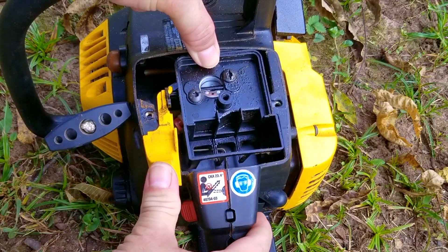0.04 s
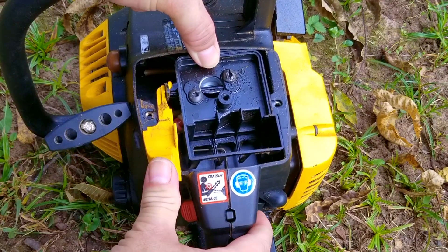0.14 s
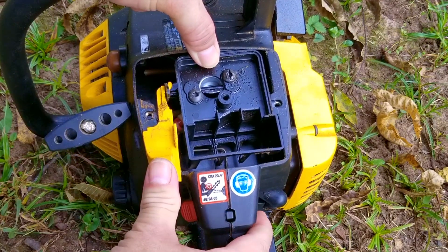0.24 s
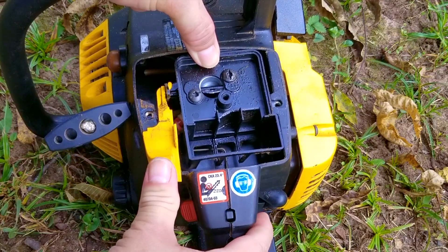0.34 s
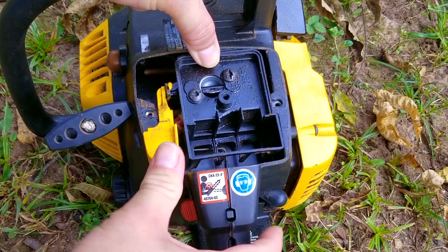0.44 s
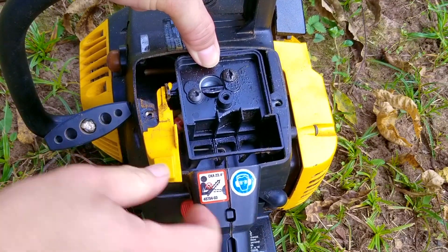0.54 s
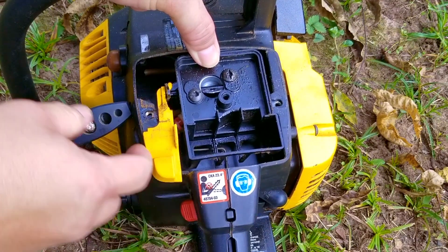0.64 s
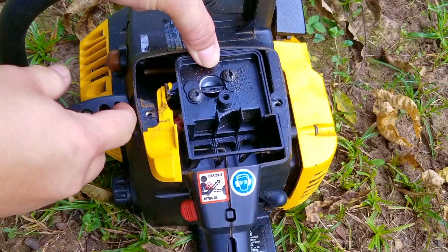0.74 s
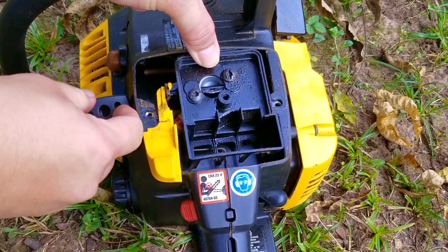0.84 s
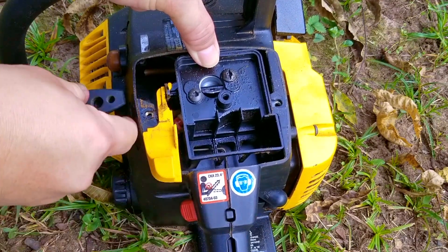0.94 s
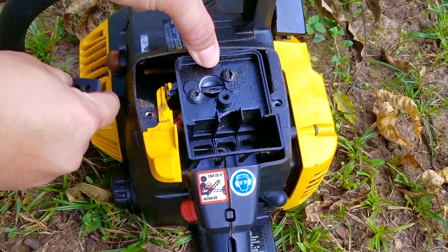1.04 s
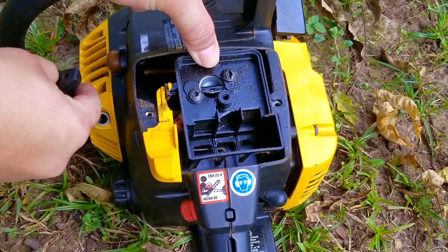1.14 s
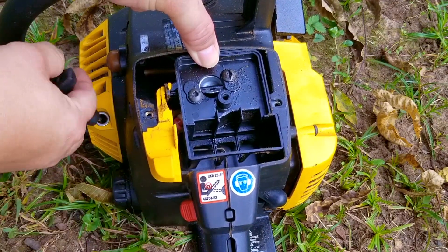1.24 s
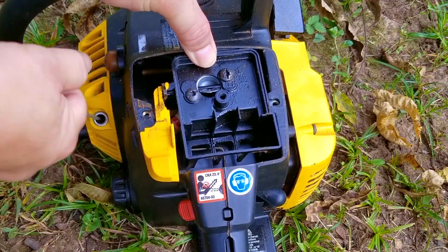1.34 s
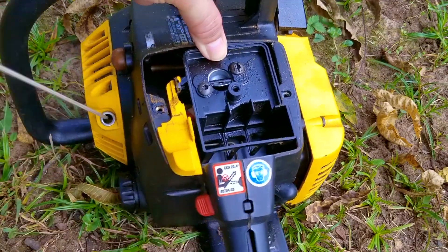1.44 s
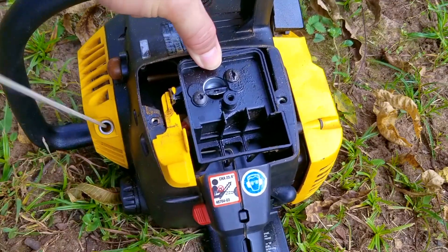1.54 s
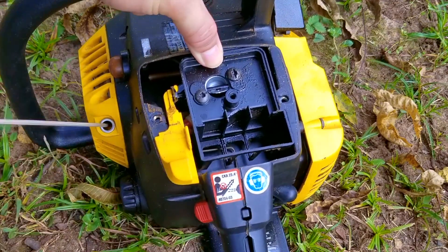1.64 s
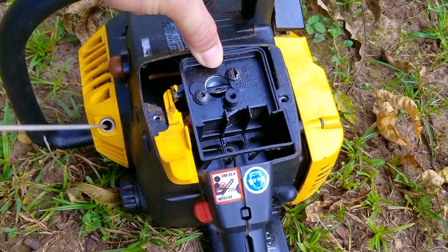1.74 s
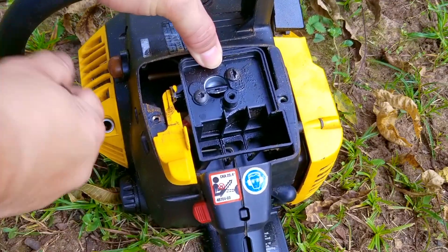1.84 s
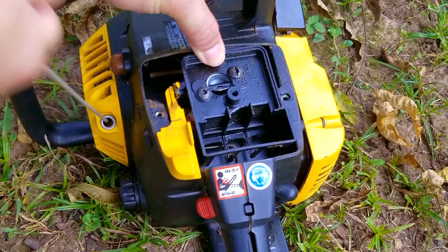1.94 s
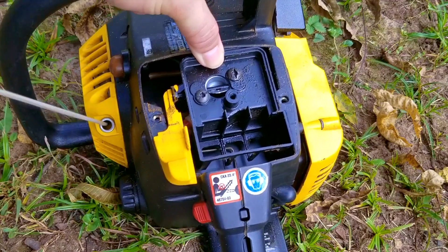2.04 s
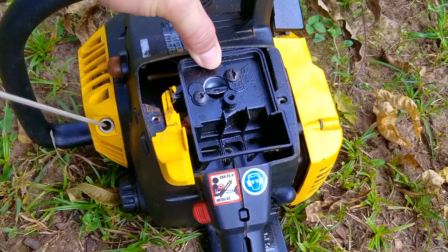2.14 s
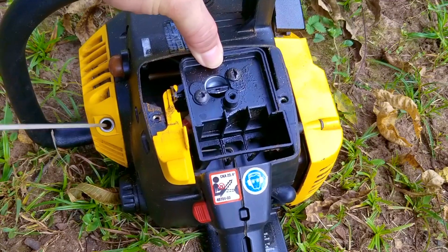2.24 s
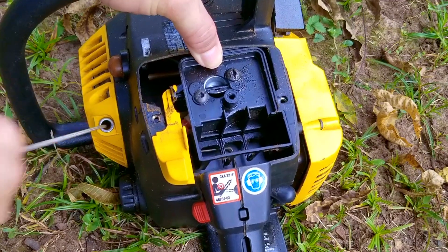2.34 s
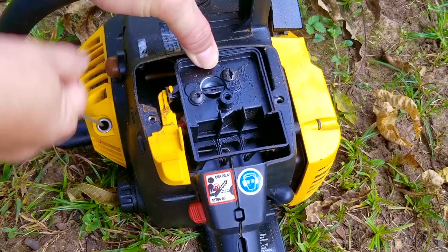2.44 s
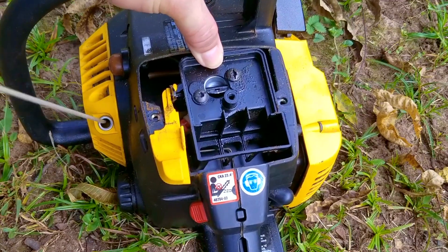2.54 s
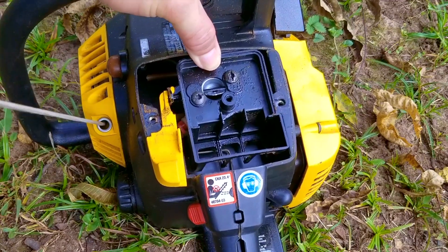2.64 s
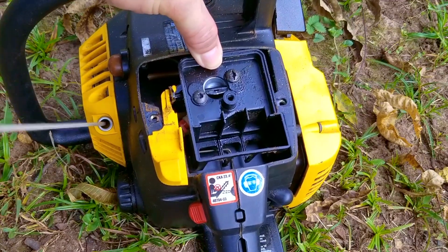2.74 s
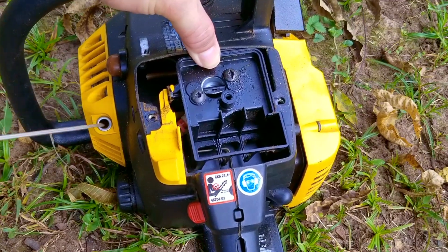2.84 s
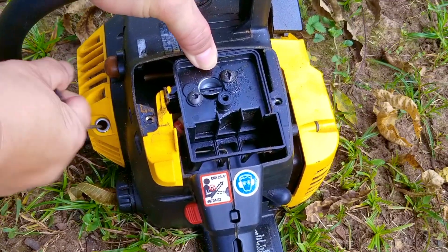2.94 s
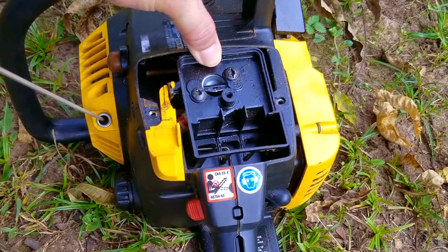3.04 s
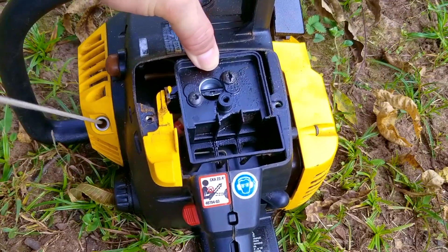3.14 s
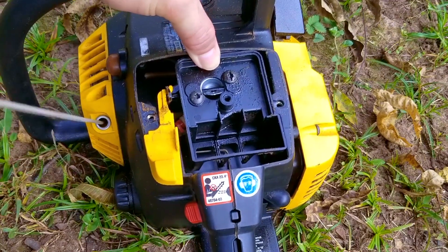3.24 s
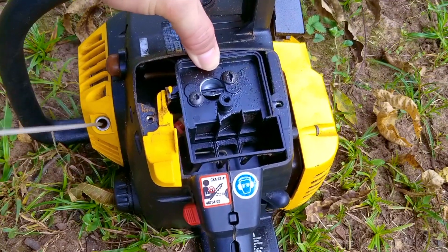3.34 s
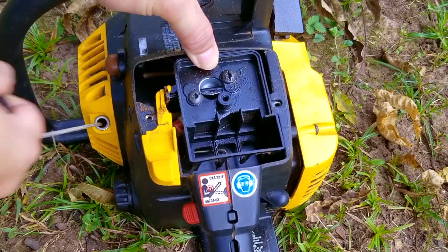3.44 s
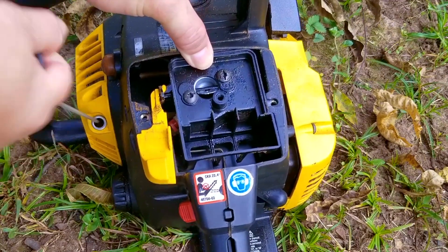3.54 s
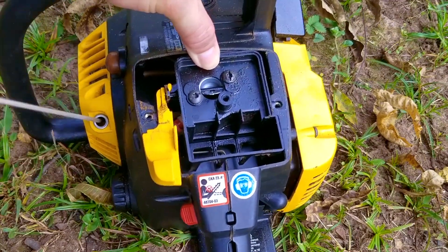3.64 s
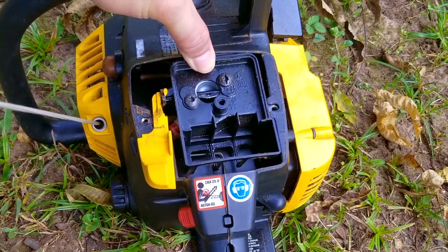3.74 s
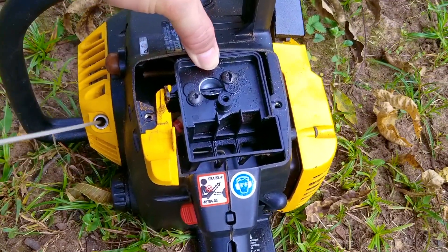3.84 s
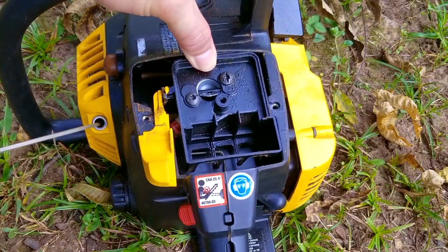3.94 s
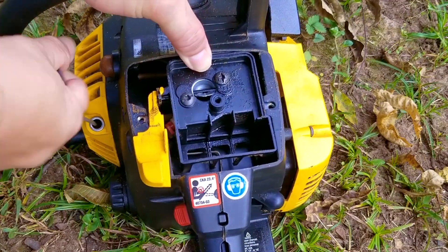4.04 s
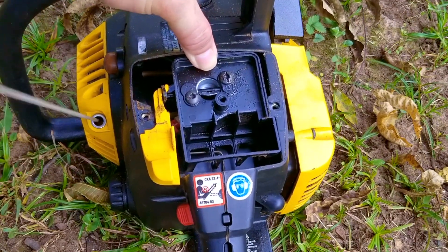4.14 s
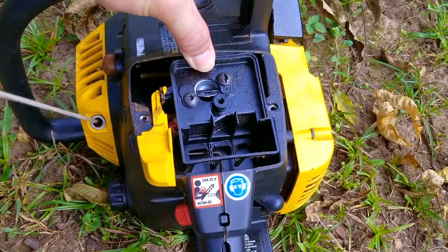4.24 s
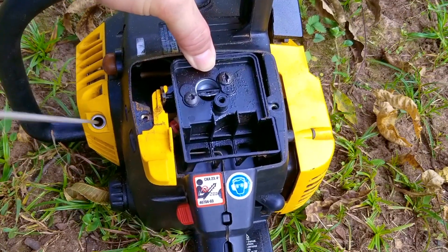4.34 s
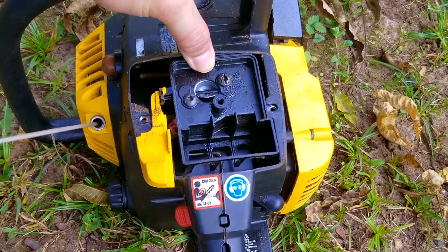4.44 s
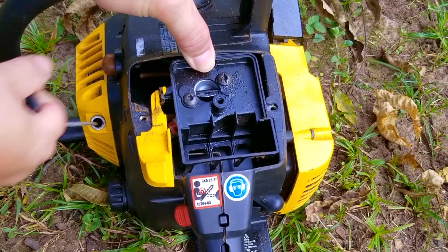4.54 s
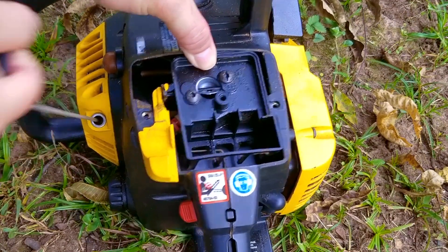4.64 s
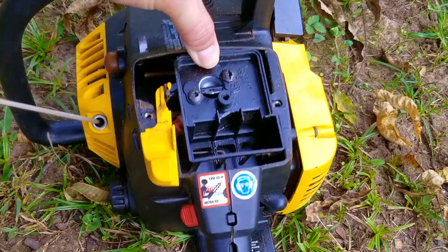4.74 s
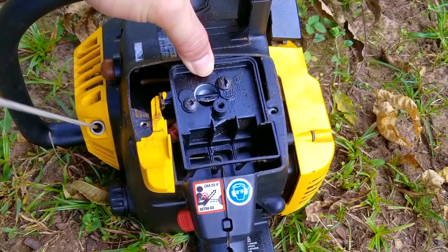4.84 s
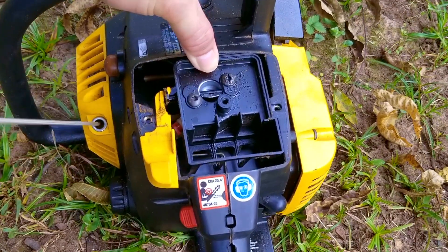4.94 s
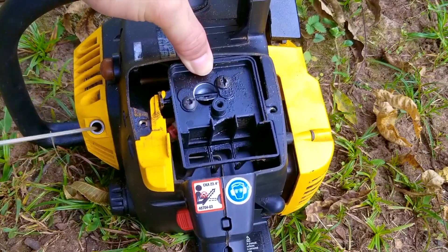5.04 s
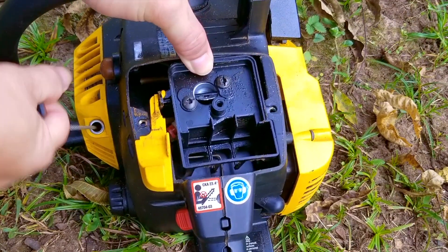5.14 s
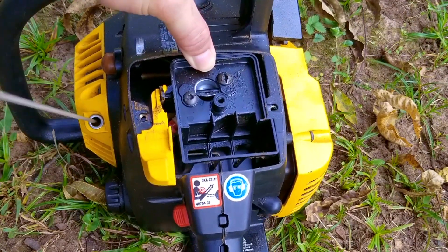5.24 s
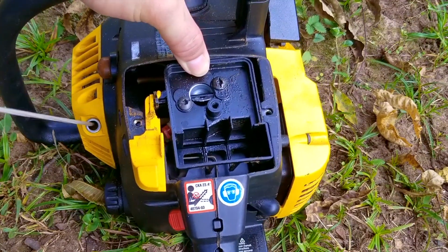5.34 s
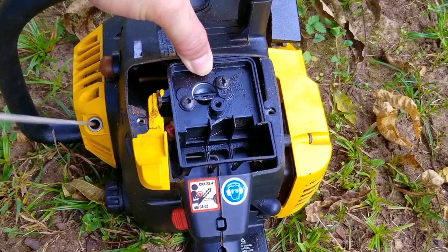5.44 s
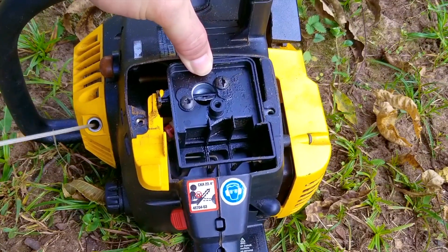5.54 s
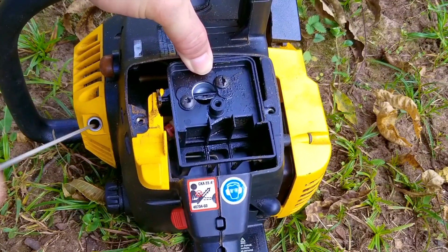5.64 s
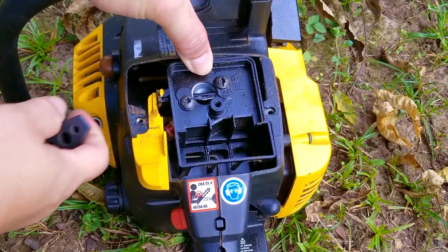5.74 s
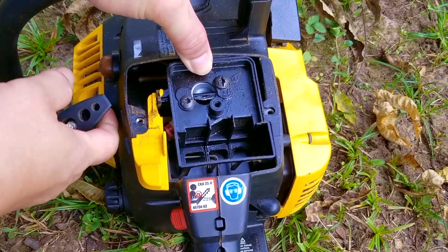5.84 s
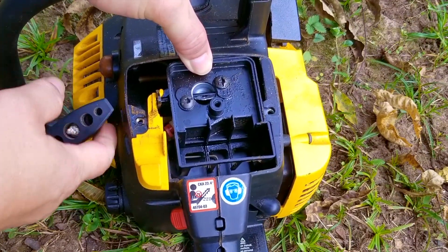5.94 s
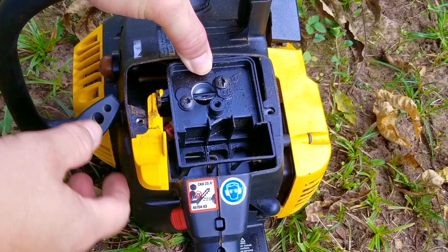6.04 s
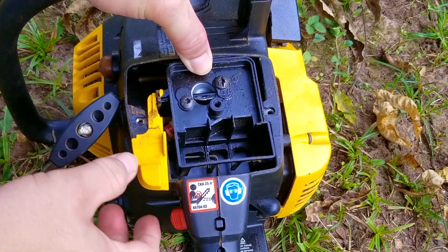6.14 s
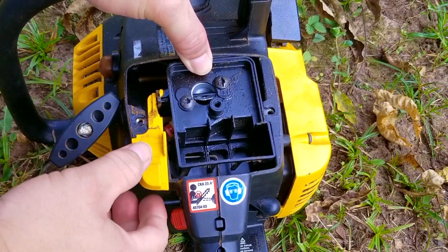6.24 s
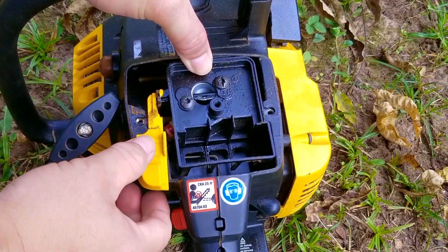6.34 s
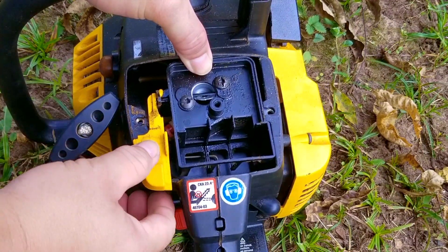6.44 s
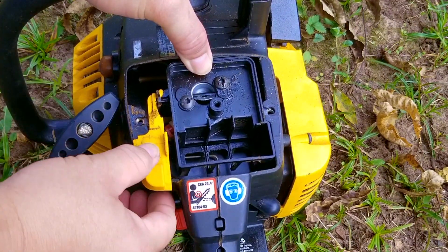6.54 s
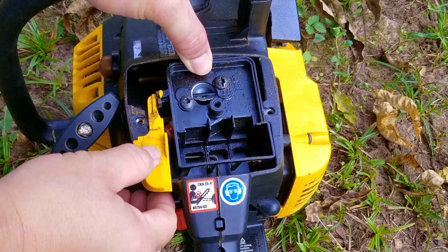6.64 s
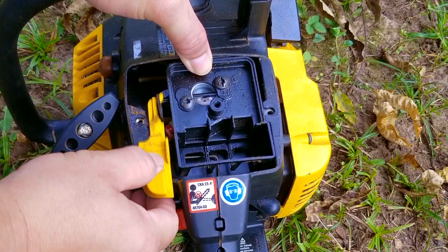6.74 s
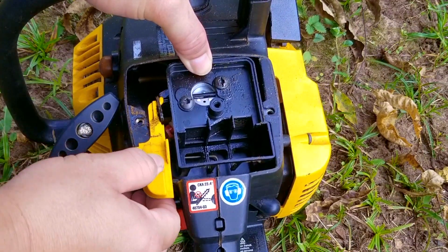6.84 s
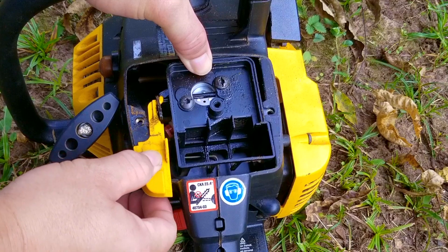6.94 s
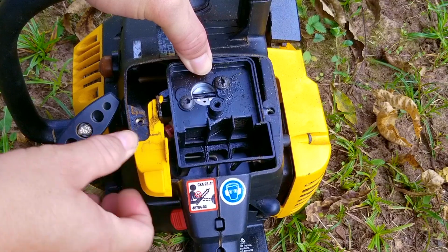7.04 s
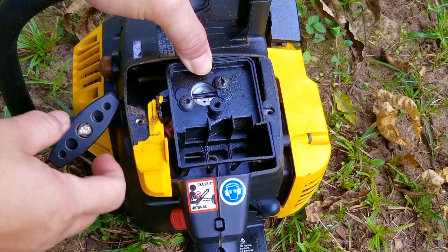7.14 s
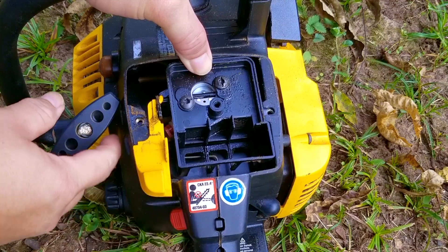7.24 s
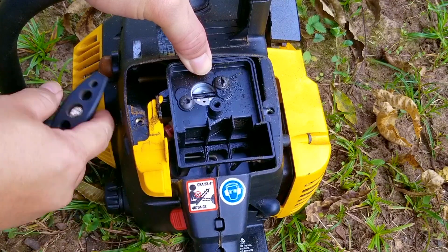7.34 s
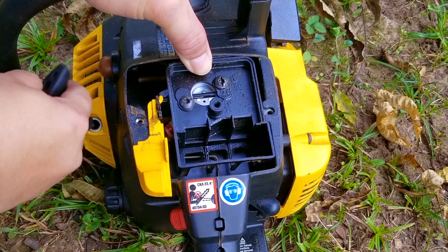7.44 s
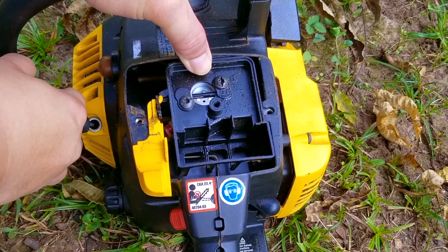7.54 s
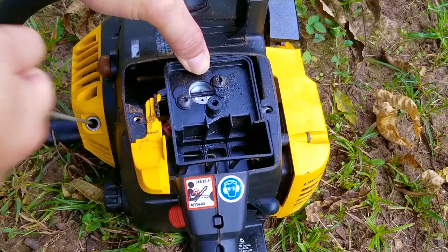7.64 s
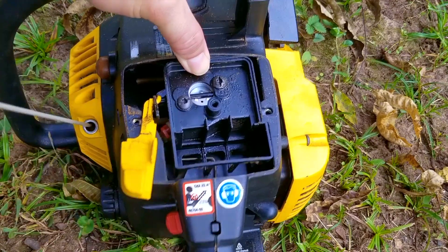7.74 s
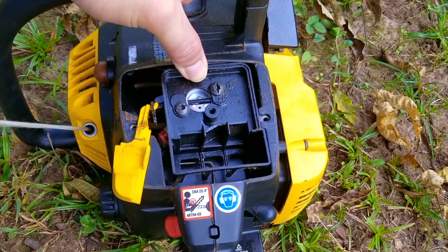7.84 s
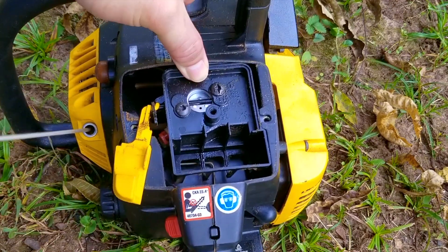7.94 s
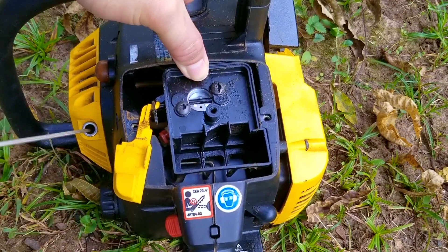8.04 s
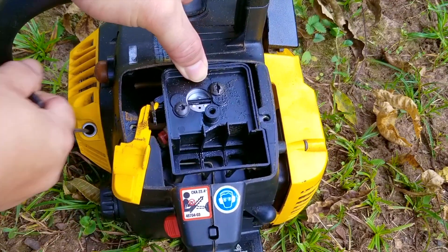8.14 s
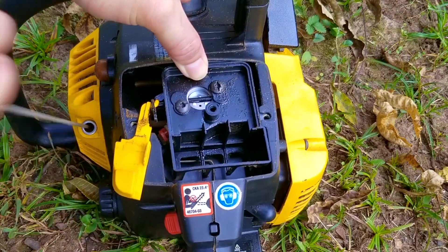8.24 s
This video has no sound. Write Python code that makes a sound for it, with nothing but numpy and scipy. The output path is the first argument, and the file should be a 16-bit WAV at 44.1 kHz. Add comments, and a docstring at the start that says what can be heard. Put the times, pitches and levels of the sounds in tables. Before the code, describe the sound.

A chainsaw's starter rope is pulled eight times in quick succession. Each pull begins with a click and a rope hiss, then the engine turns over in rapid, airy chugs that slow down as the rope rasps back in. After a pause with soft plastic knocks and a choke lever click, two more pulls follow. The engine never fires. It is heard up close, in quiet outdoor air.

```python
"""On the grass of a quiet garden, a chainsaw without its air filter is pulled over ten times and never fires.
Pawls strike the flywheel and the rope hisses out. Turn by turn the piston pumps air: suction flutters the
choke plate, a gulp excites the airway's resonances, and compressed air escapes as a turbulent puff.
The rope then rewinds over rasping pawls. Before the last two pulls the choke lever clicks open."""
import sys
import numpy as np
from scipy import signal
from scipy.fft import rfft, irfft
from scipy.io import wavfile

SR = 44100
rng = np.random.default_rng(int(sys.argv[2]) if len(sys.argv) > 2 else 0)


def transcribe(u):
    """Save the signal u as a 16-bit wav file named by the first command-line argument.

    u: samples, shape (n,) or (channels, n), limited to [-1, 1]; the rate is SR.
    q: integer samples, one column per channel.
    """
    v = np.clip(np.atleast_2d(u).T, -1, 1)
    q = np.round(v * 32767).astype(np.int16)
    wavfile.write(sys.argv[1], SR, q)


N = 365588
TIME = np.arange(N) / SR
CHOKE_OPENS_S = 6.666
INTAKE_PHASE = .56   # share of a turn from the puff to the gulp

# Table levels are relative; each source applies its own gain.
# pawls catching, and the starter coming to rest: start_s, level_db, treble_offset_db
PAWL_IMPACTS = [(1.219, -42, -13), (1.255, -41.5, -18.5), (1.788, -35, -1.5), (2.342, -37.5, -2),
                (2.864, -44, -7.5), (3.412, -35, -9.5), (3.963, -30, -12.5), (4.492, -41.5, -14.5),
                (5.057, -29.5, -14), (5.637, -50, 4), (5.745, -62.5, 12.5), (7.496, -54, -6),
                (7.51, -40.5, -2), (8.099, -37, 2)]
# modes of housing and flywheel: pitch_hz, bandwidth_hz, gain_db
HOUSING_MODES = [(664, 300, 7), (1310, 210, 4.5), (1950, 600, -0.5), (2600, 82, -2.5), (3170, 340, 1),
                 (4640, 270, -9), (6840, 110, -9.5)]
# modes of the plastic shell: pitch_hz, bandwidth_hz, gain_db
SHELL_MODES = [(460, 63, 2.5), (690, 140, 8), (880, 110, 2), (1545, 120, -8), (3070, 580, -68.5)]
# turbulence in the carburettor throat: frequency_hz, level_db
THROAT_SPECTRUM = [(200, -12.5), (550, 6), (800, 7.5), (1150, 8), (1500, 3), (2200, -6.5), (4000, -8),
                   (9000, -11), (16000, -10)]
# hiss of the rope, and of air at the choke plate: frequency_hz, level_db
HISS_SPECTRUM = [(500, -15.5), (1300, 3), (1750, -5.5), (2300, 1.5), (3400, 4.5), (5000, 6.5), (7500, 2.5),
                 (11300, 5), (16000, -4.5)]
# murmur of outdoor air: frequency_hz, level_db
OUTDOOR_SPECTRUM = [(20, -20), (50, -1.5), (110, 1.5), (175, -3.5), (250, -14), (340, -10.5), (550, -24),
                    (900, -30.5), (1700, -28.5), (3200, -41), (9000, -46.5), (16000, -50)]


def gulps(push_s=.00034, lead_s=.00033, close_s=.0122, close_share=.28):
    """Impulse excitation: the intake port opens and closes with opposite pulses that ring the airway."""
    # air modes of crankcase and throat: pitch_hz, bandwidth_hz, gain_db
    airway_modes = [(93, 21, -4), (132, 61, -4), (190, 63, -.5), (255, 45, -5), (400, 160, -17),
                    (710, 240, -8.5)]
    pushes, t = np.zeros(N), np.arange(int(.03 * SR)) / SR
    strokes = intakes("gulp_db", hold_s=.07, fade_s=.27, last_db=-35)
    strokes += [(pull["start_s"] - .003, pull["gulp_db"] - 11.5) for pull in pulls()]   # first thump
    strongest = max(db for _, db in strokes)
    for s, db in strokes:
        late, share = rng.standard_normal(2)
        width = push_s * (1 + .01 * (strongest - db))   # a slow piston uncovers the port more gently
        centre = 4 * width
        opening = np.exp(-.5 * ((t - centre) / width) ** 2)
        closing = np.exp(-.5 * ((t - centre - close_s * (1 + .09 * late)) / (1.4 * width)) ** 2)
        pulse = opening - close_share * (1 + .4 * share) * closing
        add(pushes, s - lead_s - centre, from_db(db) * pulse)
    low_cut = signal.butter(4, 52, "high", fs=SR, output="sos")
    ring = signal.sosfilt(low_cut, resonate(pushes, airway_modes))
    turbulence = from_db(-19) * pushes * noise(THROAT_SPECTRUM)
    return from_db(11) * (ring + turbulence)


def puffs(rise_s=.0011, tail_s=.0088, thud_lead_s=.003):
    """Jet noise: the port cracks open with a thud and compressed air escapes within milliseconds."""
    # turbulence of the jet: frequency_hz, level_db
    jet_spectrum = [(100, -10), (500, 1), (850, 2.5), (1500, -16.5), (2000, 1.5), (2500, -2.5), (2950, 3),
                    (3500, 4.5), (4400, 0.5), (5300, 2), (7400, -4), (9500, -1), (11500, -1), (16000, -3.5)]
    # whistling resonances of the jet: pitch_hz, bandwidth_hz, gain_db
    jet_modes = [(2500, 69, -5), (3528, 120, -0.5), (4270, 170, -5.5), (5350, 180, -3), (9330, 190, -4),
                 (11100, 250, -1.5)]
    flow, thuds, t = np.zeros(N), np.zeros(N), np.arange(int(.05 * SR)) / SR
    for s, db, length in exhausts():
        rise = 1 - np.exp(-t / rise_s)
        fall = np.exp(-(t / (1.02 * length)) ** 1.96) + from_db(-21) * np.exp(-t / tail_s)
        add(flow, s, from_db(db - 1) * rise * fall)
        add(thuds, s - thud_lead_s, from_db(db - 3) * clatter(decay_s=.0033, tail_db=-16, tail_s=.008))
    jet = flow * from_db(2 * drift(1500)) * noise(jet_spectrum)
    return jet + ring_unevenly(jet, jet_modes, shift_db=6, per_s=35) + resonate(thuds, SHELL_MODES)


def choke_flutter(pitch_hz=775, lead_s=.008, length_s=.0075, sag=.17):
    """Flow-induced vibration: suction slaps and flutters the closed plate; once open, air rushes by."""
    # modes of the choke plate: pitch_hz, bandwidth_hz, gain_db
    plate_modes = [(1343, 470, 0), (2178, 220, 5.5), (2400, 85, 4.5), (3270, 350, 0)]
    tone, air, slaps = np.zeros(N), np.zeros(N), np.zeros(N)
    strokes = intakes("flutter_db", hold_s=.115, fade_s=.22, last_db=-43)
    loudest = max(db for _, db in strokes)
    for s, db in strokes:
        detune, offset = rng.standard_normal(2)
        stretch = 1 + .025 * (loudest - db)   # longer on slow turns
        onset = s - lead_s * stretch
        progress = np.linspace(0, 1, int(length_s * stretch * SR))
        hz = pitch_hz * (1 + .023 * detune - sag * (progress - .5))
        phase = 2 * np.pi * np.cumsum(hz) / SR + .59 * offset
        swell = from_db(db + 1.5) * signal.windows.tukey(len(progress), .55)
        add(tone, onset, swell * (np.sin(phase) + .067 * np.sin(2 * phase)))
        add(air, onset, swell)
        add(slaps, onset, from_db(db + 2) * clatter(decay_s=.0026, tail_db=-20, tail_s=.007))
    chatter = ring_unevenly(slaps, plate_modes, shift_db=5, per_s=29)
    fluttering = tone * from_db(2 * drift(500)) + .14 * air * noise(HISS_SPECTRUM) + chatter
    return np.where(TIME < CHOKE_OPENS_S, fluttering, .96 * air * noise(THROAT_SPECTRUM))


def burbles(pitch_hz=390, length_s=.016, rock_delays_s=(.086, .122)):
    """Cavity resonance: small swallows of air sound the muffler for a few cycles."""
    out, t = np.zeros(N), np.arange(int(length_s * SR)) / SR
    for pull in pulls():
        first_compression = [(-.004, pull["gulp_db"] - 16)]
        last_turns = [(age, pull["gulp_db"] - 17) for age in turn_ages(pull, 0)[-2:]]
        rocking_to_rest = [(turn_ages(pull, INTAKE_PHASE)[-1] + delay, -42) for delay in rock_delays_s]
        for age, db in first_compression + last_turns + rocking_to_rest:
            cycles = np.sin(2 * np.pi * pitch_hz * (1 + .092 * rng.standard_normal()) * t)
            add(out, pull["start_s"] + age - length_s / 2, from_db(db) * np.hanning(len(t)) * cycles)
    return out


def pawl_catches(rise_s=.00089):
    """Impact excitation: the pawls snap into the flywheel and the housing rings in its modes."""
    blows, cracks = np.zeros(N), np.zeros(N)
    for s, db, treble_db in PAWL_IMPACTS:
        blow = clatter(decay_s=.0057, tail_db=-15, tail_s=.0075)
        crack = clatter(decay_s=.0039, tail_db=-11.5, tail_s=.013)
        bite = 1 - np.exp(-np.arange(len(blow)) / SR / rise_s)
        add(blows, s, from_db(db) * bite * blow)
        add(cracks, s, from_db(db + treble_db) * bite * crack)
    return from_db(10) * ring_unevenly(blows, HOUSING_MODES, shift_db=2, per_s=8) + from_db(1) * cracks


def choke_lever():
    """Free vibration: the plastic lever snaps over its detent and rings briefly."""
    # modes of the lever: pitch_hz, bandwidth_hz, gain_db
    lever_modes = [(1930, 570, -0.5), (4700, 470, -4), (5570, 330, -4), (8550, 1200, -9), (13100, 960, 7.5),
                   (14600, 1400, -8)]
    snap = np.zeros(N)
    add(snap, CHOKE_OPENS_S, from_db(-25.5) * clatter(decay_s=.0027, tail_db=-35, tail_s=.011))
    return resonate(snap, lever_modes)


def rope():
    """Sliding friction: fibres hiss through the eyelet, out and back, and excite the housing."""
    outward = np.zeros(N)
    for pull in pulls():
        envelope = friction_gain(pull, exponent=.5, take_up_db=-7, swell_s=.15, stop_s=.032)
        add(outward, caught_s(pull), from_db(pull["rope_db"]) * envelope)
    homeward = from_db(-7) * rewind_motion()[0]
    hiss = from_db(2.5 * drift(500)) * noise(HISS_SPECTRUM)
    rings = from_db(-1) * ring_unevenly(hiss, HOUSING_MODES, shift_db=6, per_s=46)
    return from_db(5) * np.hypot(outward, homeward) * rms_one(hiss + rings)


def pawl_rasp(tick_s=.0061):
    """An impact train: on the rewind the pawls slide and tick over the flywheel, ever more slowly."""
    # scraping of the pawls: frequency_hz, level_db
    rasp_spectrum = [(500, -17), (1700, -6.5), (2600, 2.5), (3600, 3), (4200, 4), (4900, 0.5), (6300, 7.5),
                     (6700, -2), (7300, 0), (9500, 3.5), (12000, -0.5), (16000, -3.5)]
    # modes of the flywheel fins: pitch_hz, bandwidth_hz, gain_db
    fin_modes = [(2540, 24, 4.5), (4160, 340, 0), (5500, 160, -4.5), (6710, 36, 14), (11600, 83, -13)]
    gain, ticks_per_s = rewind_motion()
    since_tick = np.cumsum(ticks_per_s) / SR % 1 / ticks_per_s
    sliding = .15 * ticks_per_s / ticks_per_s.max()
    roughness = from_db(2.5 * drift(120) + 2 * drift(1500))
    contact = rms_one((sliding + np.exp(-since_tick / tick_s)) * roughness)
    rasp = contact * noise(rasp_spectrum)
    rings = ring_unevenly(rasp, fin_modes, shift_db=3, per_s=38)
    knocking = ring_unevenly(contact * rng.standard_normal(N), SHELL_MODES, shift_db=4, per_s=45)
    return from_db(3.5) * gain * rms_one(rasp + rings + from_db(-2) * knocking)


def crank_rub():
    """Friction noise: piston and bearings rub as the engine turns; the open choke lets more out."""
    # rubbing inside the engine: frequency_hz, level_db
    rub_spectrum = [(30, -20), (100, 6.5), (190, 5.5), (275, 0), (370, 1), (500, -4.5), (730, 5),
                    (1000, -7), (1400, -7.5), (2200, -12), (6000, -37.5)]
    turning = np.zeros(N)
    for pull in pulls():
        envelope = friction_gain(pull, exponent=.94, take_up_db=-.5, swell_s=.05, stop_s=.12)
        add(turning, caught_s(pull), envelope)
    rub = noise(rub_spectrum) + from_db(-3) * (TIME > CHOKE_OPENS_S) * noise(THROAT_SPECTRUM)
    return from_db(-43 + 3 * drift(60)) * turning * rub


def knocks():
    """Damped modes: the plastic shell answers soft blows of the hand and starter grip."""
    # blows on the shell: start_s, level_db
    contacts = [(.58, -62), (.635, -55), (5.752, -53), (5.909, -49.5), (5.935, -61)]
    blows = np.zeros(N)
    for s, db in contacts:
        add(blows, s, from_db(db + 6) * clatter(decay_s=.0019, tail_db=-12.5, tail_s=.028))
    return resonate(blows, SHELL_MODES)


def hand_rustle():
    """Dry friction: skin shifts on the plastic housing."""
    # movements of the hand: centre_s, length_s, level_db
    shifts = [(.35, 0.15, -85), (6.704, 0.13, -77), (7.15, 0.14, -80.5), (7.387, 0.48, -76.5)]
    # skin on plastic: frequency_hz, level_db
    skin_spectrum = [(200, -5), (600, 2.5), (1500, 2.5), (2200, 6.5), (3300, -2), (5100, 0.5), (7000, -4.5),
                     (10000, 3), (16000, -9)]
    gain = np.full(N, from_db(-90))
    for s, length, db in shifts:
        add(gain, s - length / 2, from_db(db) * np.hanning(int(length * SR)))
    return gain * from_db(2.8 * drift(80)) * noise(skin_spectrum)


def garden():
    """Ambient noise: a low murmur of outdoor air whose level wanders."""
    # course of the murmur: time_s, level_db
    murmur_levels = [(0, -62), (1.15, -62.3), (5.7, -62.5), (5.95, -67), (6.65, -61), (7.1, -61),
                     (7.3, -58), (8.29, -63)]
    return from_db(np.interp(TIME, *np.transpose(murmur_levels))) * noise(OUTDOOR_SPECTRUM)


def pulls():
    """The driving motion: each pull of the rope by column name, timed from its first compression."""
    columns = ("start_s", "start_turns_per_s", "target_turns_per_s", "pull_s", "coast_turns_per_s",
               "turn_count", "gulp_db", "flutter_db", "first_puff_db", "puff_db", "puff_s", "rope_db")
    # pulls of the starter rope, in the columns above
    rope_pulls = [(1.278, 3.0, 38.5, .102, 11.6, 6, -18.5, -21.5, -24, -24, .008, -44.5),
                  (1.850, 15.3, 34.2, .091, 11.5, 6, -24, -26, -22, -23.8, .0048, -50),
                  (2.395, 18.9, 31.6, .103, 10.4, 6, -26, -26.5, -26, -25.5, .0063, -49.5),
                  (2.931, 15.2, 36.1, .099, 11.1, 7, -25.5, -29, -24.5, -24, .0053, -47.5),
                  (3.454, 11.5, 34.4, .119, 11.2, 7, -25, -26, -26, -23.8, .006, -48.5),
                  (4.002, 12.4, 35.6, .112, 10.9, 7, -24, -25, -25, -23.8, .0057, -48.5),
                  (4.540, 6.2, 35.6, .123, 11.1, 7, -24.5, -26, -33, -23.3, .0056, -47.5),
                  (5.096, 11.4, 33.3, .122, 10.5, 7, -24, -25, -25.5, -24, .0062, -48),
                  (7.549, .5, 34.8, .135, 9.2, 6, -18, -32, -31, -39, .012, -42.5),
                  (8.142, 5.5, 38.8, .13, 10, 6, -22.3, -37, -43, -42, .008, -47.5)]
    return [dict(zip(columns, row)) for row in rope_pulls]


def crank_speed(pull, age, spin_up_s=.0726, spin_down_s=.0663):
    """Inertia: turns per second rise exponentially under the pull, then relax to a coasting speed."""
    target, coast = pull["target_turns_per_s"], pull["coast_turns_per_s"]
    pulled, coasted = np.clip(age, 0, pull["pull_s"]), np.maximum(age - pull["pull_s"], 0)
    driven = target + (pull["start_turns_per_s"] - target) * np.exp(-pulled / spin_up_s)
    return coast + (driven - coast) * np.exp(-coasted / spin_down_s)


def turn_ages(pull, phase):
    """Angle is the integral of speed: seconds into a pull at which each turn passes this phase."""
    age = TIME[:SR]
    turns = np.cumsum(crank_speed(pull, age)) / SR
    return np.interp(np.arange(pull["turn_count"]) + phase, turns, age)


def intakes(column, hold_s, fade_s, last_db):
    """Suction weakens as the crank runs down: (time_s, level_db) of each intake stroke."""
    return [(pull["start_s"] + age, np.interp(age, [hold_s, hold_s + fade_s], [pull[column], last_db]))
            for pull in pulls() for age in turn_ages(pull, INTAKE_PHASE)]


def exhausts(leak_after_s=.2, leak_db_per_s=90):
    """Leakage drains a slow piston's pressure: (start_s, level_db, length_s) of each puff."""
    rows = []
    for pull in pulls():
        for age in turn_ages(pull, 0)[:-1]:   # the last turn holds no pressure
            strength, stretch = rng.standard_normal(2)
            leak_db = leak_db_per_s * max(age - leak_after_s, 0)
            db = pull["puff_db"] - leak_db if age > 0 else pull["first_puff_db"]
            length = pull["puff_s"] * np.exp(.12 * stretch)
            rows.append((pull["start_s"] + age, db + .7 * strength, length))
    spit = (7.774, -21.5, .011)   # air blows back once through the open choke
    return rows + [spit]


def friction_gain(pull, exponent, take_up_db, swell_s, stop_s):
    """A power law of crank speed: friction noise swells from the bite and dies after the last turn."""
    age = TIME[:SR] + caught_s(pull) - pull["start_s"]
    relative_speed = np.maximum(crank_speed(pull, age), 4) / 28
    swell = from_db(np.interp(age, [0, swell_s], [take_up_db, 0]))
    stopped = np.maximum(age - turn_ages(pull, INTAKE_PHASE)[-1], 0)
    return relative_speed ** exponent * swell * np.exp(-(stopped / stop_s) ** 2)


def caught_s(pull, within_s=.085):
    """Ratchet engagement: when the pawls bite, shortly before the first compression."""
    return min([s for s, _, _ in PAWL_IMPACTS if s > pull["start_s"] - within_s] + [pull["start_s"]])


def rewind_motion(fast_per_s=148, slow_per_s=55, attack_s=.0044, release_s=.0094):
    """Spring recoil: gain and tick rate of the pulley, which slows as the rope comes home."""
    # returns of the rope: start_s, length_s, level_db
    rewinds = [(1.563, .2, -46.5), (2.105, 0.19, -49), (2.637, 0.2, -48.5), (3.247, .15, -47.5),
               (3.774, .15, -46), (4.314, 0.17, -46), (4.865, 0.16, -46.5), (5.424, 0.19, -47.5),
               (7.843, 0.22, -45.5)]
    gain, extra_per_s, age = np.zeros(N), np.zeros(N), TIME[:SR // 2]
    for s, length, db in rewinds:
        progress = age / length
        edges = np.minimum(age / attack_s, 1) * np.exp(-np.maximum(age - length, 0) / release_s)
        add(gain, s, edges * from_db(db + np.interp(progress, [0, .55, 1], [-2, 0, -7])))
        add(extra_per_s, s, np.interp(progress, [.4, 1], [fast_per_s - slow_per_s, 0]))
    return gain, slow_per_s + extra_per_s


def clatter(decay_s, tail_db, tail_s):
    """A contact transient: a short crack of noise with a decaying tail."""
    t = np.arange(int(.07 * SR)) / SR
    return rng.standard_normal(len(t)) * (np.exp(-t / decay_s) + from_db(tail_db) * np.exp(-t / tail_s))


def resonate(x, modes):
    """Modal superposition: parallel two-pole resonators."""
    out = 0
    for hz, width, db in modes:
        radius = np.exp(-np.pi * width / SR)
        numerator = np.array([1, 0, -1]) * (1 - radius ** 2) / 2
        denominator = [1, -2 * radius * np.cos(2 * np.pi * hz / SR), radius ** 2]
        out = out + from_db(db) * signal.lfilter(numerator, denominator, x + 1e-18)
    return out


def ring_unevenly(x, modes, shift_db, per_s):
    """Modal superposition with strengths that drift, so each contact rings differently."""
    return sum(from_db(shift_db * np.clip(drift(per_s), -2, 2)) * resonate(x, [mode]) for mode in modes)


def scatter(x, decay_s):
    """Diffuse reflection: convolution with a dense, decaying cluster of echoes of unit energy."""
    t = np.arange(int(6 * decay_s * SR)) / SR
    echoes = rng.standard_normal(len(t)) * np.exp(-t / decay_s)
    return signal.oaconvolve(x, echoes / np.linalg.norm(echoes))[:N]


def colour(x, points, size=4096):
    """Minimum-phase filtering along a (frequency_hz, gain_db) curve."""
    hz, db = np.transpose(points)
    grid = np.maximum(np.arange(size // 2 + 1) * SR / size, 1)
    magnitude = from_db(np.interp(np.log(grid), np.log(hz), db))
    cepstrum = irfft(np.log(magnitude))
    cepstrum[1:size // 2] *= 2   # folding the cepstrum makes the filter causal
    cepstrum[size // 2 + 1:] = 0
    return signal.oaconvolve(x, irfft(np.exp(rfft(cepstrum))))[:len(x)]


def noise(points):
    """Spectral shaping: coloured noise of rms 1."""
    return rms_one(colour(rng.standard_normal(N), points))


def drift(per_s):
    """Random modulation: Gaussian values joined by straight lines."""
    knots = rng.standard_normal(int(N / SR * per_s) + 2)
    return np.interp(TIME * per_s, np.arange(len(knots)), knots)


def add(track, s, sound):
    """Superposition: mix a short sound in at time s."""
    at = int(round(s * SR))
    track[at:at + len(sound)] += sound[:max(N - at, 0)]


def from_db(db):
    """Decibels as an amplitude ratio."""
    return 10 ** (np.asarray(db) / 20)


def rms_one(x):
    """Normalisation to unit power."""
    return x / np.sqrt(np.mean(x ** 2) + 1e-20)


def scene(right_delay_s=.00009):
    """Acoustic shadow: the saw faces left; the right side hears it shaded, later and by reflections."""
    # direct path to the right, shaded by the saw: frequency_hz, gain_db
    shadow = [(30, -14), (200, -12.6), (750, -11.3), (2000, -14.2), (4000, -17.5), (6300, -18), (7500, -26),
              (11000, -22), (16000, -20)]
    # scattered paths to the right: frequency_hz, gain_db
    scatter_response = [(30, -36), (300, -44), (700, -17.5), (1300, -16), (3000, -17.5), (6300, -16),
                        (7500, -28), (11000, -22.5), (16000, -19)]
    # reflections from the surroundings: frequency_hz, gain_db
    echo_response = [(100, -16), (1000, -24), (6000, -18), (14000, -30)]
    parts = [gulps() + choke_flutter() + burbles() + pawl_catches() + choke_lever() + knocks(),
             puffs(),
             rope() + crank_rub() + pawl_rasp()]
    saw = sum(parts)
    surroundings = colour(scatter(saw, decay_s=.048), echo_response)
    left = saw + surroundings + garden() + hand_rustle()
    shaded = colour(np.interp(TIME - right_delay_s, TIME, left), shadow)
    scattered = colour(sum(scatter(part, decay_s=.0045) for part in parts), scatter_response)
    right = shaded + scattered + from_db(-86.5) * noise(OUTDOOR_SPECTRUM)
    return np.array([left, right])


def record(dry, cutoff_hz=16000):
    """Band limiting: a steep low-pass removes the highest treble."""
    return signal.sosfilt(signal.ellip(8, .3, 70, cutoff_hz, fs=SR, output="sos"), dry)


dry = scene()
out = record(dry)
transcribe(out)
```